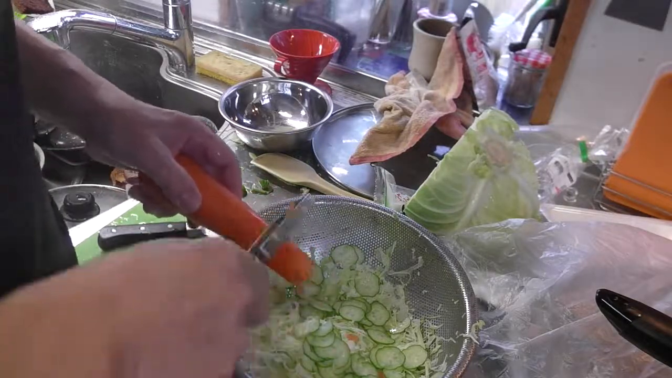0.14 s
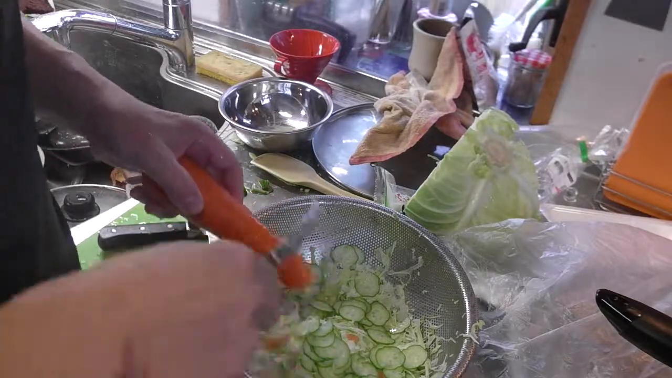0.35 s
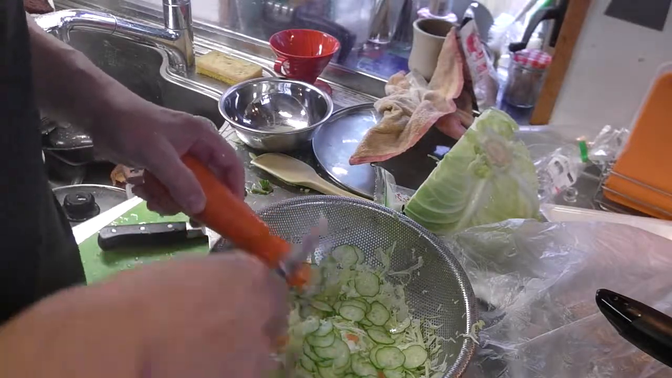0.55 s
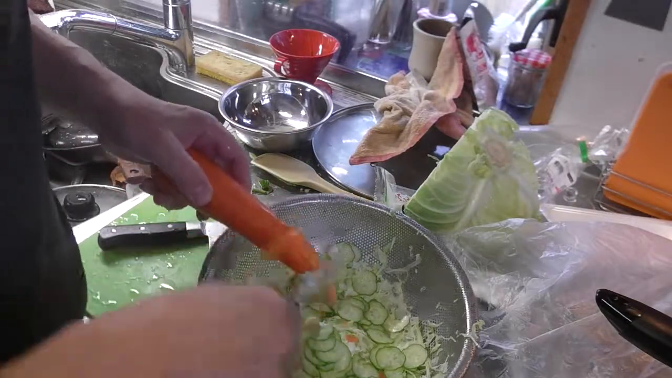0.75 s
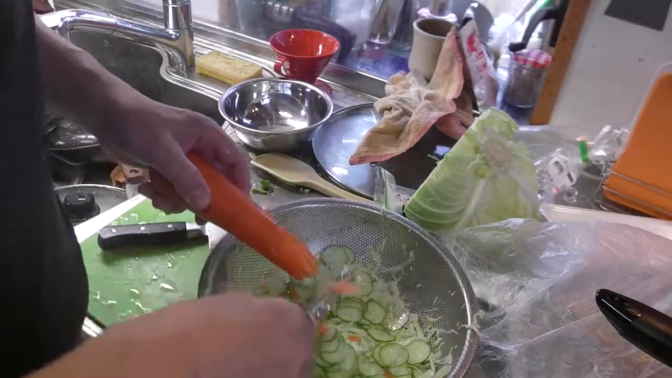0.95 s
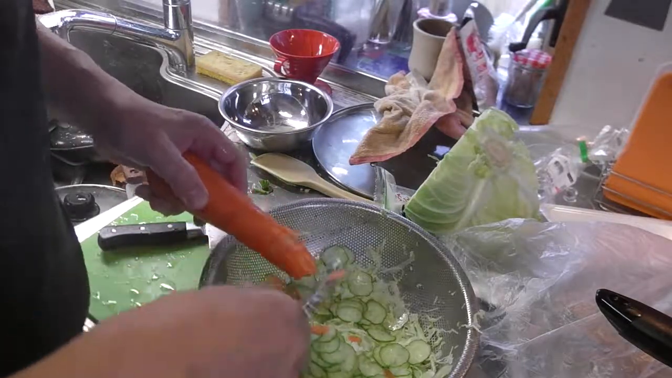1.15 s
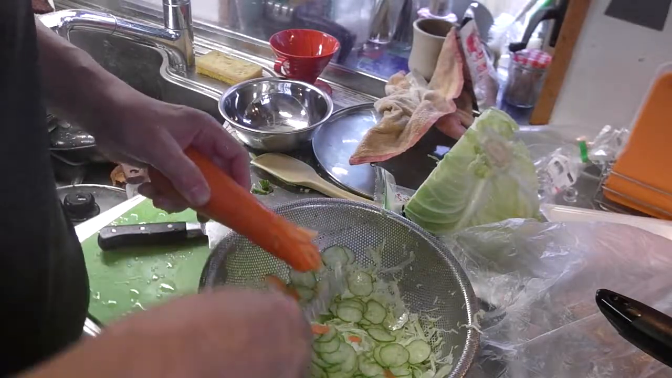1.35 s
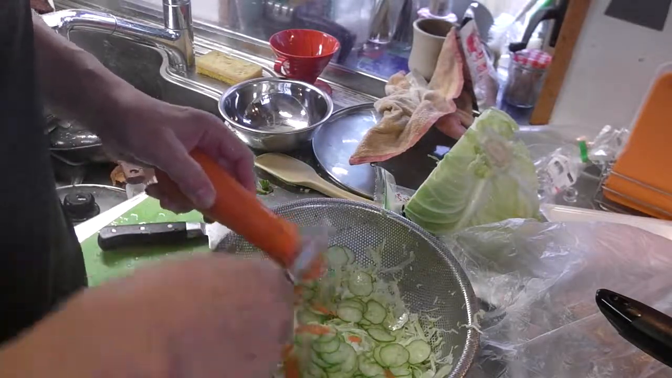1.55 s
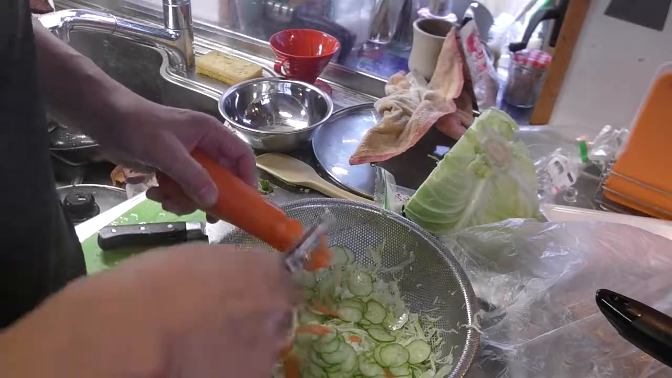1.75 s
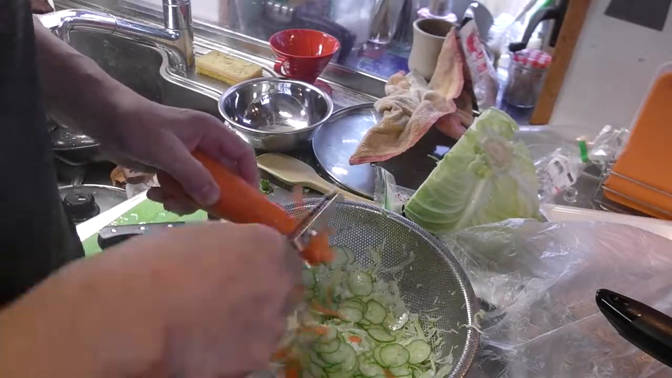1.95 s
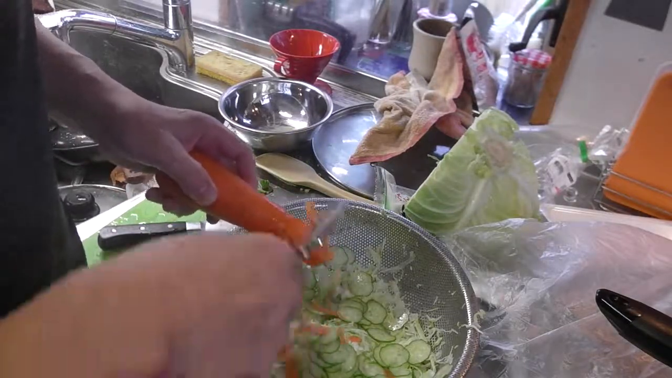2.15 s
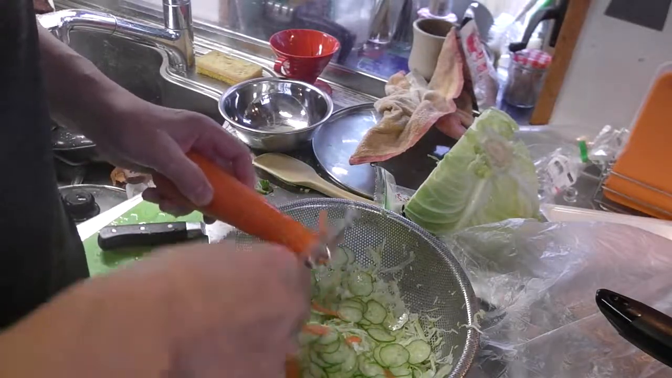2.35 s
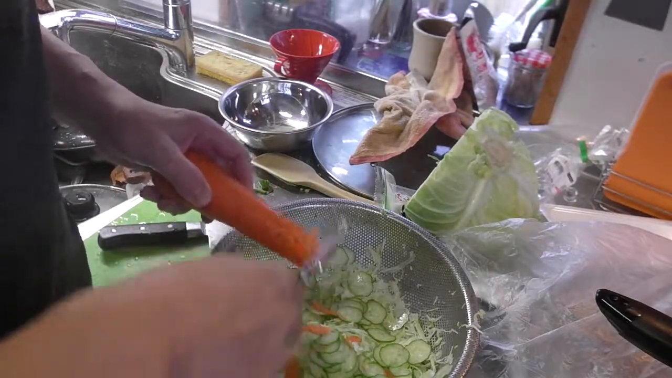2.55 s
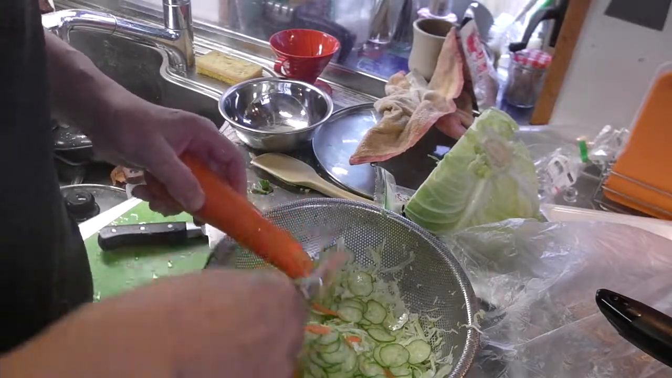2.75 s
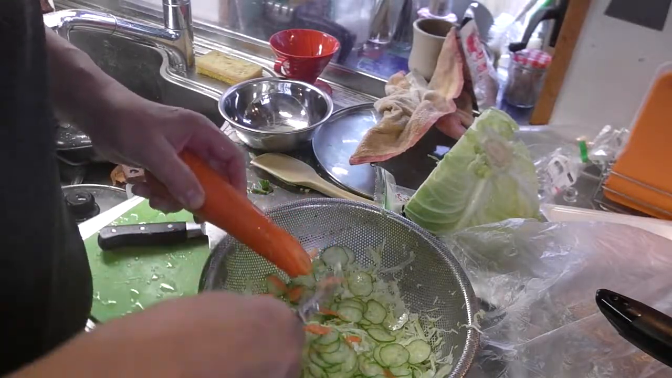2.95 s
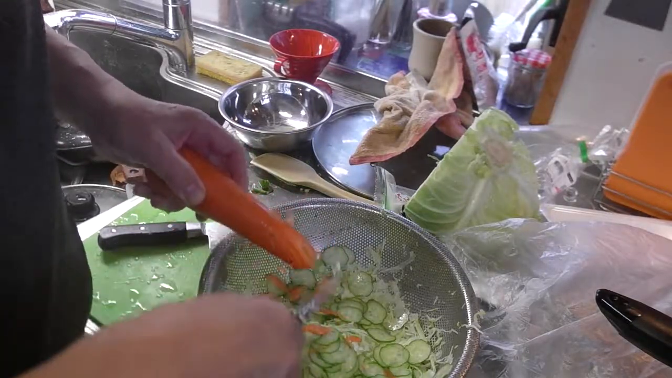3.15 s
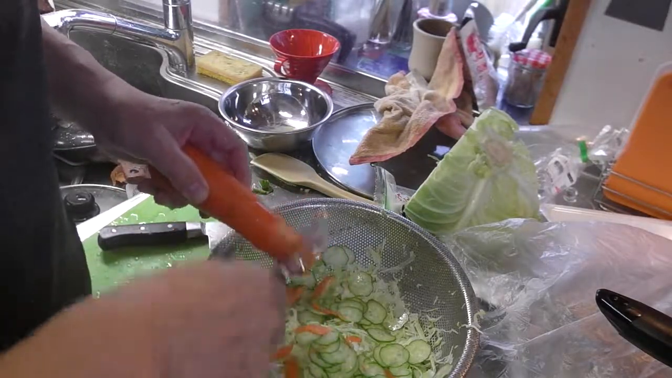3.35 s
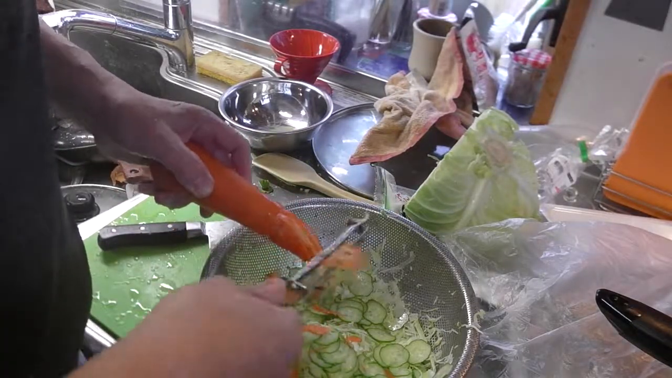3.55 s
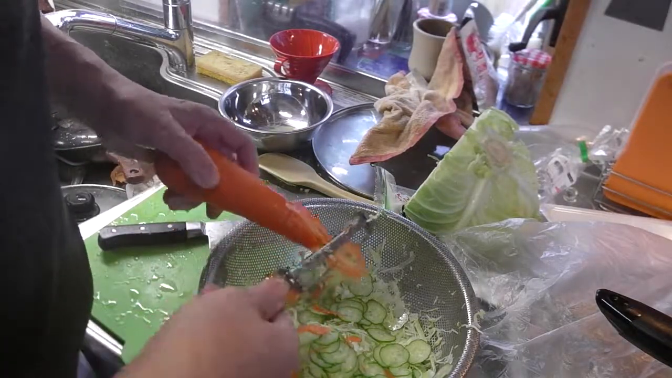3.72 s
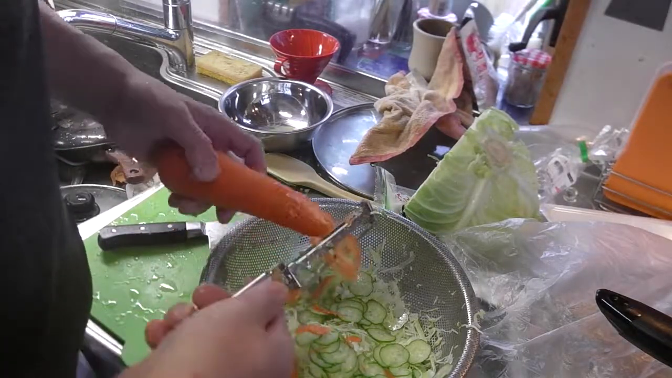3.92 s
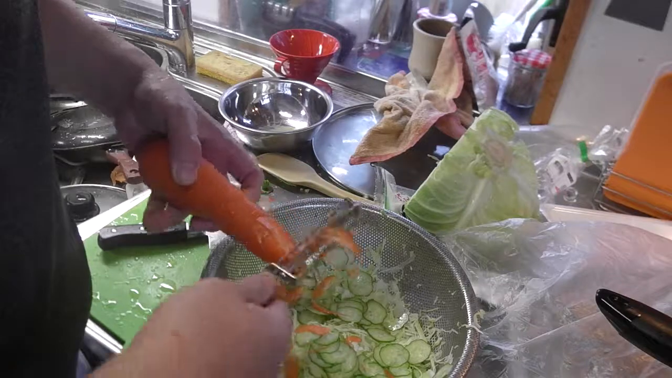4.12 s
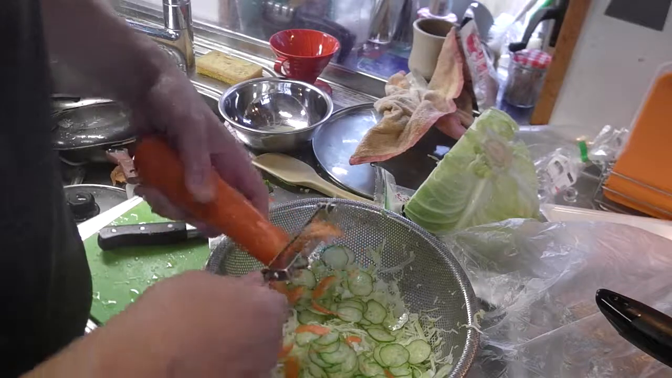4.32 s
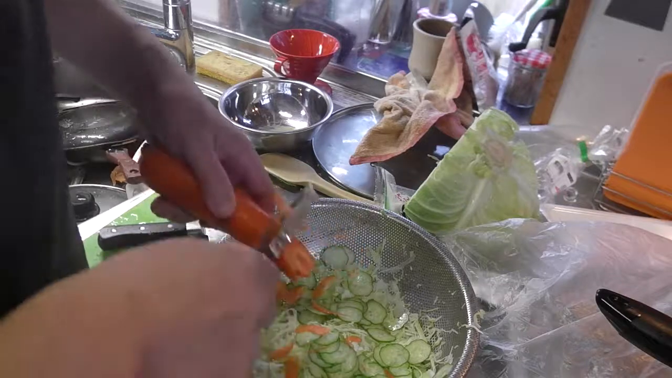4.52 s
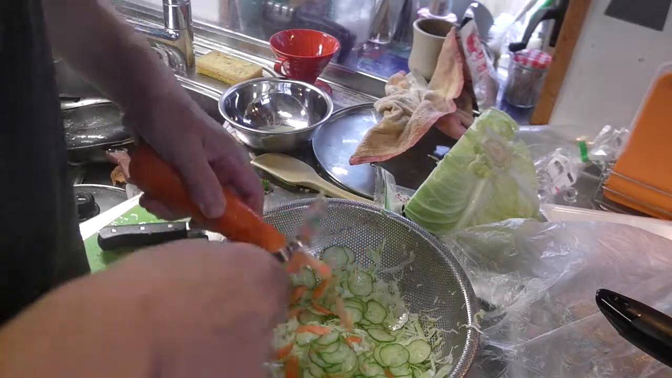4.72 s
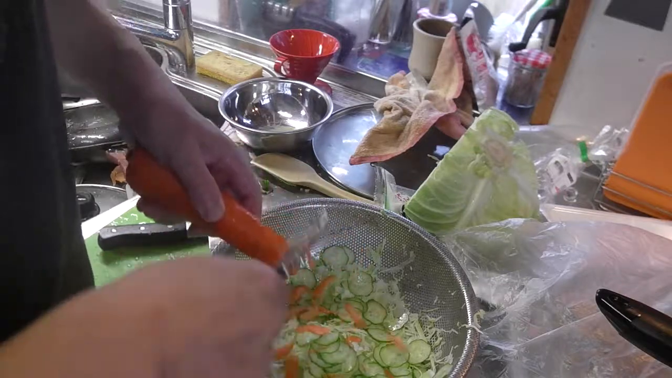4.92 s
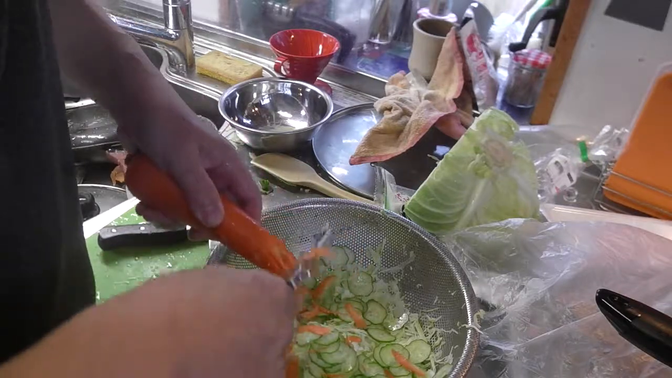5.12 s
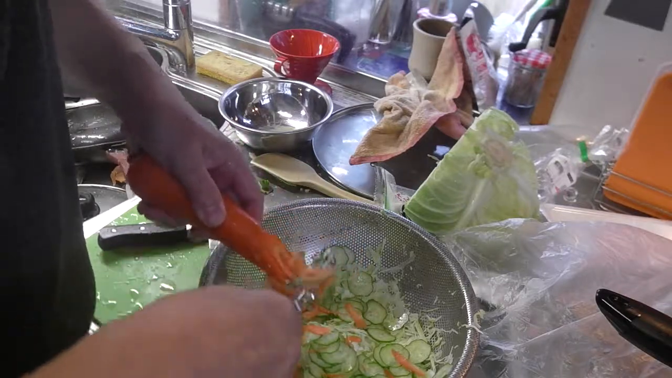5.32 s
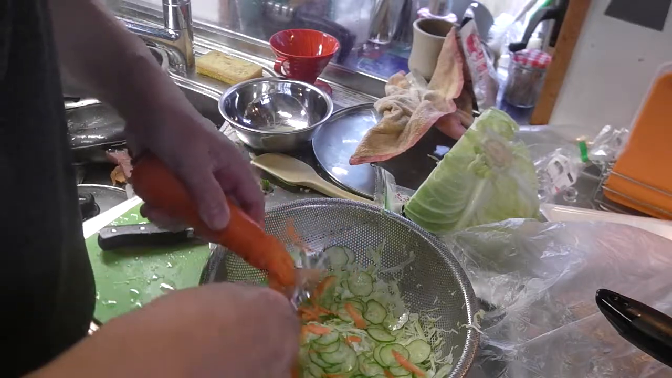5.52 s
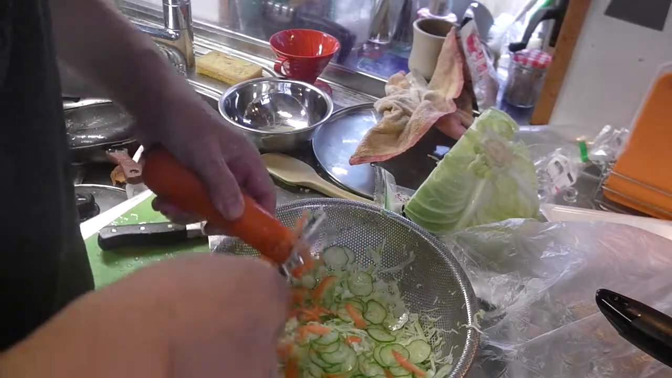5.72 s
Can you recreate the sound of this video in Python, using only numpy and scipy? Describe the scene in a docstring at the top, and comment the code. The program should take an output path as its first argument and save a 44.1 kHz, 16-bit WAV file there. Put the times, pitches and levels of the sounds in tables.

```python
"""A steel julienne peeler shreds a carrot over a strainer, about four quick strokes a second.
In each stroke the loose blade touches down, its teeth bite with a crack, rasp through the flesh and
flick free at the tip; each contact rings the steel. Behind it a kitchen fan rumbles, cloth brushes
the counter and a few dull bumps land. The camera delays the band under 4 kHz by a moment,
and its gain control ducks at every bite."""
import sys
import numpy as np
from scipy import signal
from scipy.fft import rfft, irfft
from scipy.io import wavfile
from scipy.ndimage import uniform_filter1d, minimum_filter1d

SR = 44100
rng = np.random.default_rng(int(sys.argv[2]) if len(sys.argv) > 2 else 0)


def unload_audio(sound):
    """Save the sound as a 16-bit wav file, at the path given as the first command line argument."""
    columns = np.transpose(np.atleast_2d(sound))
    # keep every value between -1 and 1, then stretch to whole-number steps
    steps = np.round(np.clip(columns, -1, 1) * 32767)
    wavfile.write(sys.argv[1], SR, steps.astype(np.int16))


N = 258867
TIME = np.arange(N) / SR
FREQS = np.fft.rfftfreq(N, 1 / SR)


def undb(db):
    """Decibels to gain."""
    return np.exp(np.asarray(db) * (np.log(10) / 20))


def unit(x):
    """Scale to an energy of one."""
    return x / np.sqrt(np.sum(x ** 2))


def colour(points, hz):
    """Level in dB of a (Hz, dB) curve at the given frequencies."""
    points_hz, db = np.transpose(points)
    return np.interp(np.log(hz + 1), np.log(points_hz), db)


def causal(db):
    """The tightest impulse with the given spectrum (minimum phase)."""
    cepstrum = irfft(np.log(undb(db)))
    half = len(cepstrum) // 2
    cepstrum[1:half] *= 2
    cepstrum[half + 1:] = 0
    return irfft(np.exp(rfft(cepstrum)))


def band(x, hz, kind):
    """Gentle low-pass or high-pass."""
    return signal.sosfilt(signal.butter(2, hz, kind, fs=SR, output="sos"), x)


def add(track, start_s, x):
    """Mix a sound into the track at a time."""
    start = round(start_s * SR)
    track[..., start:start + x.shape[-1]] += x[..., :N - start]


def stereo(mid, side):
    """Left and right from mid and side."""
    return np.array([mid + side, mid - side])


def wander(t, rate_hz):
    """Random modulation: values joined by straight ramps."""
    points = rng.standard_normal(int(t[-1] * rate_hz) + 2)
    return np.interp(t * rate_hz, np.arange(len(points)), points)


def grains(count, spread_db):
    """Dense tiny fractures of very unequal size."""
    return rng.standard_normal(count) * undb(spread_db * np.minimum(rng.standard_normal(count), 2))


# The fan's air noise. Each row: frequency in Hz, relative level in dB.
FAN_SPECTRUM = [(20, -27.5), (35, -29), (50, -15), (62, -21), (85, -6), (160, -4.5), (240, -11),
                (500, -22.5), (650, -24.5), (1400, -24), (2600, -30), (4000, -35), (8000, -46),
                (16000, -57)]
# Resonances and hollows of its housing. Each row: centre in Hz, width in Hz, boost or cut in dB.
FAN_HOUSING = [(75.8, 9.8, 5), (114, 16.6, -9.5), (138.7, 6.8, 4.5), (155, 6.5, 7), (239, 7.6, -0.5),
               (308.6, 16.5, -14.5), (405, 3.3, -14.5), (440, 45, 12), (1071, 52, -15.5), (1202, 30, 6.5)]
# Its hum and whine. Each row: pitch in Hz, level in dB.
FAN_HUM = [(156, -58.5), (398, -66), (824, -62), (1195, -73), (1519, -60.5), (2337, -60.5)]

def fan(air_db, side_db, waver_db, buffet_db, buffet_hz):
    """Turbulent air coloured by the housing, with wavering tones; the bass buffets near the centre."""
    housing_db = sum(db * np.exp(-((FREQS - hz) / width) ** 2) for hz, width, db in FAN_HOUSING)
    shape = undb(colour(FAN_SPECTRUM, FREQS) + housing_db)
    stereo_width = undb(colour([(30, -14), (150, -25), (400, -24.5), (700, -12), (1300, -19),
                                (2400, -25.5), (4400, -8), (12000, 0)], FREQS))
    mid = irfft(rfft(rng.standard_normal(N)) * shape, N)
    side = irfft(rfft(rng.standard_normal(N)) * shape * stereo_width, N)
    buffet = undb(buffet_db * wander(TIME, buffet_hz))
    mid += band(mid, 440, "lowpass") * (buffet - 1)
    tones = 0
    for hz, db in FAN_HUM:
        amplitude = np.sqrt(2) * undb(db + waver_db * wander(TIME, rate_hz=8))
        tones += amplitude * np.sin(2 * np.pi * hz * TIME + wander(TIME, rate_hz=8))
    return undb(air_db) * stereo(mid, undb(side_db) * side) / np.std(mid) + tones


# Cloth on the counter. Each row: peak time in seconds, centre in Hz, level in dB, swell time in seconds.
CLOTH_SWISHES = [(0.681, 2410, -46, 0.049), (0.744, 5060, -39, 0.046), (.755, 1300, -42, 0.045),
                 (0.919, 4760, -38, 0.035), (0.929, 3420, -50, 0.05)]

def cloth(width_hz, rough_db):
    """Soft swishes of fabric that catches and slips."""
    out, t = np.zeros(N), TIME[:SR // 5]
    freqs, middle_s = np.fft.rfftfreq(len(t), 1 / SR), t[-1] / 2
    for peak_s, hz, db, swell_s in CLOTH_SWISHES:
        catches = rng.standard_normal(len(t)) * undb(rough_db * wander(t, rate_hz=202.5))
        hiss = irfft(rfft(catches) / (1 + ((freqs - hz) / width_hz) ** 2), len(t))
        swell = np.exp(-((t - middle_s) / swell_s) ** 2)
        add(out, peak_s - middle_s, undb(db) * swell * hiss / np.std(hiss))
    return out


# Dull thuds. Each row: peak time in seconds, pitch in Hz, level in dB, swell time in seconds.
COUNTER_BUMPS = [(0.659, 72.4, -19.5, 0.014), (0.756, 80.5, -21.5, 0.018), (.756, 208, -31, 0.0044),
                 (4.632, 62, -35, 0.0067)]

def bumps():
    """Soft knocks heave the counter for a few slow cycles."""
    out = np.zeros(N)
    for peak_s, hz, db, swell_s in COUNTER_BUMPS:
        t = TIME - peak_s
        out += undb(db) * np.exp(-(t / swell_s) ** 2) * np.sin(2 * np.pi * hz * t)
    return out


def kitchen(x, near_db, near_t60, room_db, room_t60, damp_hz, side_db, side_hz):
    """Bowls and counter scatter the sound at once; the room adds a dull tail. Only the treble is wide."""
    t = TIME[:SR // 6]

    def echoes():
        near = unit(rng.standard_normal(len(t)) * undb(-60 * t / near_t60) * (t > .0005))
        dull_noise = band(rng.standard_normal(len(t)), damp_hz, "lowpass")
        tail = unit(dull_noise * undb(-60 * t / room_t60) * (t > .005))
        return undb(near_db) * near + undb(room_db) * tail
    mid = (t == 0) + echoes()  # direct sound plus reflections
    side = undb(side_db) * band(echoes(), side_hz, "highpass")
    return stereo(signal.fftconvolve(x, mid), signal.fftconvolve(x, side))


# The crack of blade on carrot. Each row: frequency in Hz, relative level in dB.
CRACK_SPECTRUM = [(100, -37), (600, -23), (1100, -15), (1800, -11.5), (2400, -1.5), (3200, -5.5), (4200, 6),
                  (5400, -0.5), (6300, 4), (7900, -3.5), (9400, 6.5), (10700, -4), (11800, 7.5), (13200, 1),
                  (14300, -1), (16000, -3.5)]
# The ring of blade and frame. Each row: pitch in Hz, relative level in dB, seconds to fade by 60 dB.
STEEL_MODES = [(2375, -2.5, 0.044), (2930, -13.5, .045), (3670, -32, 0.1), (4005, -1.5, 0.066),
               (3995, -6, 0.081), (4050, -3.5, 0.11), (4250, -3.5, 0.11), (6530, -12, 0.027),
               (6660, -14.5, .05), (8755, 1.5, 0.033), (9270, -9, 0.033), (9680, -7.5, .055),
               (11860, -3.5, 0.021), (11730, -3.5, 0.031), (12300, -20, 0.0238), (13900, -15.5, 0.065)]

def peeler(force, ring_db, detune, uneven_db):
    """A dry crack and a steel ring; where the blade is held shifts each mode's strength and pitch."""
    t = TIME[:SR // 8]
    crack = unit(causal(colour(CRACK_SPECTRUM, np.fft.rfftfreq(512, 1 / SR))))
    ring = 0
    for hz, db, t60 in STEEL_MODES:
        shift, strength = rng.standard_normal(2)
        mode = np.sin(2 * np.pi * hz * (1 + detune * shift) * t) * undb(-60 * t / t60)
        ring += undb(db + uneven_db * strength) * unit(mode)
    response = undb(ring_db) * unit(ring)
    add(response, 0, crack)
    return signal.fftconvolve(force, response)


def contact(peak_s, db, body_db, bright_db, rise_s, settle_s, grain_db, body_hz=3600, bright_hz=8000):
    """A burst of micro-impacts that swells quickly and dies as the blade settles."""
    force, lead_s = np.zeros(N), .008
    t = np.arange(2048) / SR - lead_s
    hz = np.fft.rfftfreq(len(t), 1 / SR)
    envelope = np.exp(np.minimum(t / rise_s, -t / settle_s))
    burst = unit(envelope * grains(len(t), grain_db))
    body_shelf = 1 / (1 + (hz / body_hz) ** 8)
    treble_tilt = 1 / 2 - 1 / (1 + (hz / bright_hz) ** 4)
    eq = undb(body_db * body_shelf + bright_db * treble_tilt * (1 - body_shelf))
    add(force, peak_s - lead_s, undb(db) * irfft(rfft(burst) * eq))
    return force


# The swivel blade knocks in its frame, mostly while the carrot is turned.
# Each row: time in seconds, relative levels of the clink and of its chatter in dB.
BLADE_CLINKS = [(.009, -38, -45), (4.015, -27.5, -27.5), (4.251, -35, -50), (4.325, -23.5, -30.5),
                (4.456, -21, -36)]

def clinks(chatter_lag_s):
    """Steel on steel, duller than the cutting; the loose blade chatters on briefly."""
    force = np.zeros(N)
    for clink_s, db, chatter_db in BLADE_CLINKS:
        force += contact(clink_s, db, body_db=-2.5, bright_db=-10,
                         rise_s=.0007, settle_s=.0038, grain_db=4.5)
        force += contact(clink_s + chatter_lag_s, chatter_db, body_db=.5, bright_db=-8,
                         rise_s=.008, settle_s=.018, grain_db=5)
    return force


# Pulls down the carrot. Each row: times of touch, bite and flick in seconds,
# their three relative levels in dB, boost or cut of the bite's body in dB.
CARROT_STROKES = [(.085, .131, .215, -25, -6.5, -18.5, -2), (.320, .358, .436, -30, -12.5, -21, 5.5),
                  (.529, .567, .635, -27, -15.5, -20, 6), (.763, .793, .877, -23.5, -13, -21.5, 3),
                  (.995, 1.020, 1.111, -23.5, -18, -19.5, 0), (1.219, 1.251, 1.315, -27, -13, -19.5, 1),
                  (1.450, 1.481, 1.555, -31, -15, -22.5, -1), (1.663, 1.708, 1.765, -30, -2.5, -20.5, -1),
                  (1.886, 1.931, 1.981, -27.5, -8, -22, 2), (2.109, 2.149, 2.195, -25, -11, -22, 2),
                  (2.319, 2.368, 2.420, -21, -6.5, -19, 3), (2.540, 2.589, 2.655, -24.5, -11.5, -19, -1),
                  (2.767, 2.806, 2.869, -23, -11, -16.5, 2), (3.000, 3.040, 3.103, -25.5, -14.5, -19, 2.5),
                  (3.245, 3.288, 3.355, -32.5, -3.5, -16, -2.5),
                  (4.446, 4.465, 4.554, -32, -13.5, -11.5, 1), (4.677, 4.714, 4.778, -30, -9.5, -17.5, 3.5),
                  (4.908, 4.938, 5.048, -33, -17.5, -19.5, 6), (5.147, 5.166, 5.248, -30.5, -13, -16.5, 4),
                  (5.378, 5.396, 5.500, -27.5, -11, -18.5, -1.5), (5.636, 5.655, 5.751, -35, -13.5, -14, 4)]

def strokes(usual_bite_db, brighten_db_per_s):
    """Each stroke is a light rattling touch, a faint bounce, a sharp bite and a thin flick at the tip."""
    force = np.zeros(N)
    for touch_s, bite_s, flick_s, touch_db, bite_db, flick_db, body_db in CARROT_STROKES:
        bounce_s = touch_s + .55 * (bite_s - touch_s)
        # A harder bite settles sooner, one with more body later.
        settle_s = .002 * undb(.4 * (usual_bite_db - bite_db + body_db))
        # Touch and flick brighten as the carrot is pared down.
        pared_db = brighten_db_per_s * bite_s
        force += contact(touch_s, touch_db, body_db=-2.5, bright_db=pared_db + .6,
                         rise_s=.0008, settle_s=.0046, grain_db=4.5)
        force += contact(bounce_s, touch_db - 10, body_db=-3, bright_db=1.5,
                         rise_s=.0009, settle_s=.004, grain_db=4.5)
        force += contact(bite_s, bite_db, body_db, bright_db=.3,
                         rise_s=.00036, settle_s=settle_s, grain_db=.6)
        force += contact(flick_s, flick_db, body_db=-5.5, bright_db=pared_db - 3.4,
                         rise_s=.0015, settle_s=.0024, grain_db=3)
    return force


def rasp(db, grain_db, judder_db, judder_hz, fade_db, skid_s, skid_offset_db):
    """The teeth skid briefly, then tear through cells in uneven slips, fading as the carrot tapers."""
    force = np.zeros(N)
    usual_pull_s, soften_db_per_s = .075, 90  # a slower pull rasps more softly
    for _, bite_s, flick_s, touch_db, bite_db, *_ in CARROT_STROKES:
        pull_s = flick_s - bite_s
        tear_db = db - soften_db_per_s * (pull_s - usual_pull_s)
        skid_db = skid_offset_db + (touch_db + bite_db) / 2
        t = TIME[:int((skid_s + pull_s) * SR)]
        pressure_db = np.where(t < skid_s, skid_db - tear_db, -fade_db * (t - skid_s) / pull_s)
        tear = grains(len(t), grain_db) * undb(judder_db * wander(t, judder_hz) + pressure_db)
        add(force, bite_s - skid_s, undb(tear_db) * unit(tear) * np.sqrt(len(t)))
    return band(force, 2200, "highpass")


def peeling(gain_db):
    """Strokes, clinks and rasp drive the peeler; the hand moves, so each contact rings and echoes anew."""
    force = strokes(usual_bite_db=-11, brighten_db_per_s=.9) + clinks(chatter_lag_s=.024)
    force += rasp(db=-61, grain_db=19, judder_db=3.5, judder_hz=375, fade_db=6,
                  skid_s=.011, skid_offset_db=-43)
    contact_times = [s for stroke in CARROT_STROKES for s in stroke[:3]] + [s for s, *_ in BLADE_CLINKS]
    starts = sorted(int((s - .003) * SR) for s in contact_times)  # just ahead of each attack
    out = np.zeros((2, N))
    for start, end in zip(starts, starts[1:] + [N]):
        blade = peeler(force[start:end], ring_db=-7.2, detune=.004, uneven_db=3.6)
        in_room = kitchen(blade, near_db=-1.5, near_t60=.035, room_db=-8, room_t60=.17,
                          damp_hz=11000, side_db=-3, side_hz=6000)
        add(out, start / SR, in_room)
    return undb(gain_db) * out


def scene():
    """The peeling up front, a few bumps and swishes at the counter, and the fan as a bed."""
    return (peeling(gain_db=23) + bumps() + cloth(width_hz=2000, rough_db=3.5)
            + fan(air_db=-35.9, side_db=1.6, waver_db=2.5, buffet_db=3, buffet_hz=15))


def gain_control(x, threshold_db, ratio, release_db_per_s, makeup_db, ahead_s):
    """Ducks just ahead of a loud sound and recovers steadily."""
    power = uniform_filter1d(np.mean(x ** 2, axis=0), SR // 200)
    level_db = 10 * np.log10(np.abs(power) + 1e-12)
    cut_db = np.maximum(level_db - threshold_db, 0) * (1 - 1 / ratio)
    recovery_db = release_db_per_s * TIME
    held_db = np.maximum.accumulate(cut_db + recovery_db) - recovery_db
    span = int(ahead_s * SR)
    duck_db = minimum_filter1d(-held_db, span, origin=-(span // 2))
    return x * undb(makeup_db + uniform_filter1d(duck_db, span // 2))


def record(dry):
    """The low band arrives late, save for a faint leak; then gain control, clipping and a top cut."""
    crossover_hz, low_lag_s, top_hz = 3970, .021, 15700
    low_gain = 1 / np.sqrt(1 + (FREQS / crossover_hz) ** 36)
    leak = undb(-24.5) * np.minimum(FREQS / 700, 1)
    high_gain = np.maximum(np.sqrt(1 - low_gain ** 2), leak)
    delay = np.exp(-2j * np.pi * FREQS * low_lag_s)
    x = irfft(rfft(dry) * (high_gain + low_gain * delay), N)
    x = gain_control(x, threshold_db=-27.5, ratio=1.468, release_db_per_s=75, makeup_db=5.5, ahead_s=.018)
    top_cut = signal.ellip(8, .2, 70, top_hz, fs=SR, output="sos")
    return signal.sosfilt(top_cut, np.clip(x, -1, 1))


dry = scene()
out = record(dry)
unload_audio(out)
```